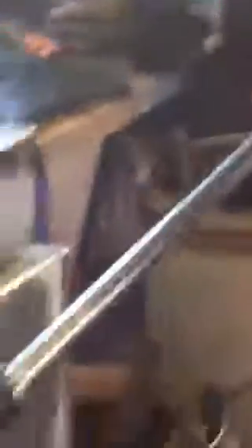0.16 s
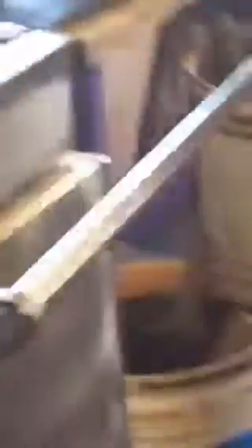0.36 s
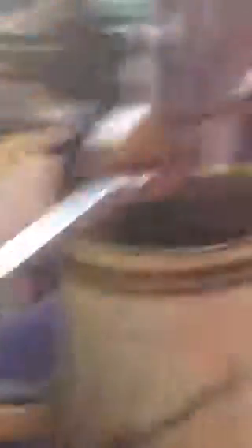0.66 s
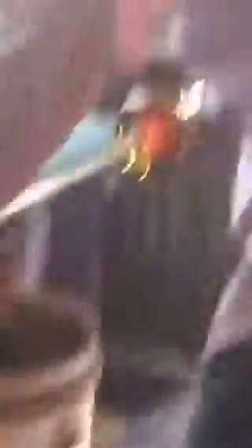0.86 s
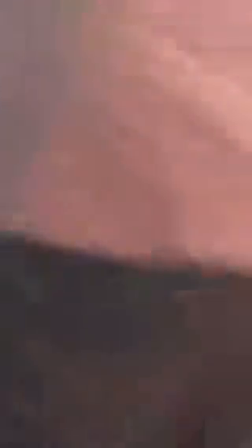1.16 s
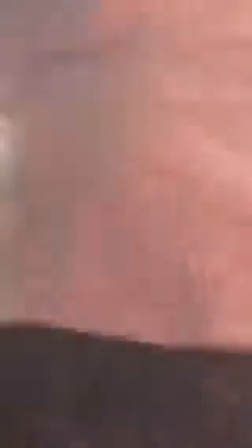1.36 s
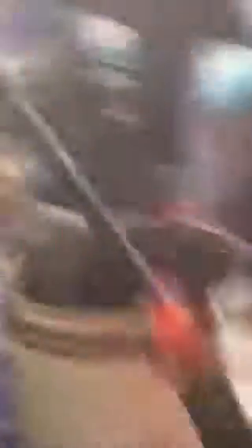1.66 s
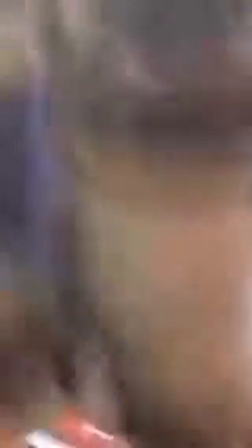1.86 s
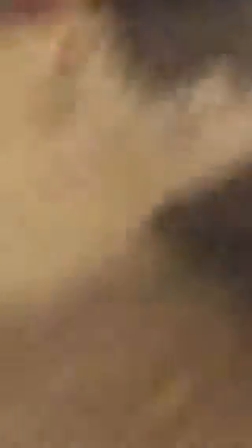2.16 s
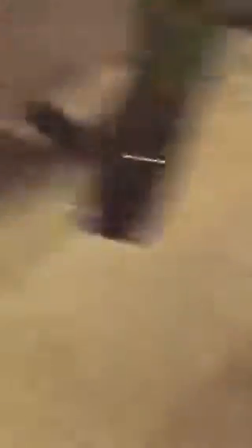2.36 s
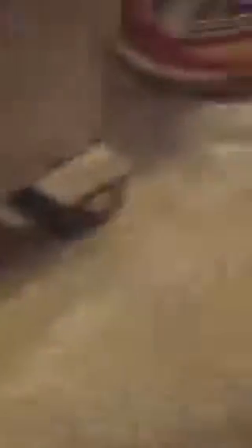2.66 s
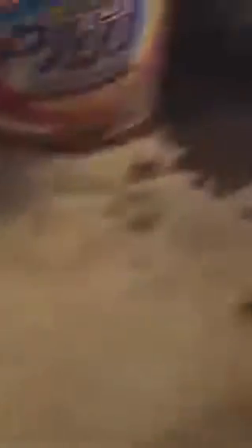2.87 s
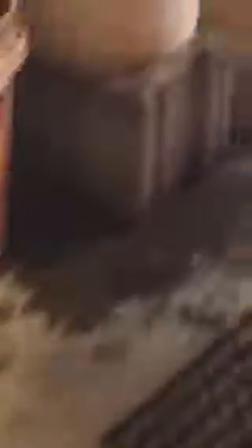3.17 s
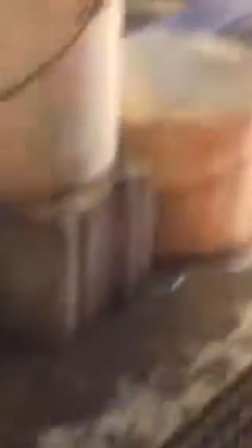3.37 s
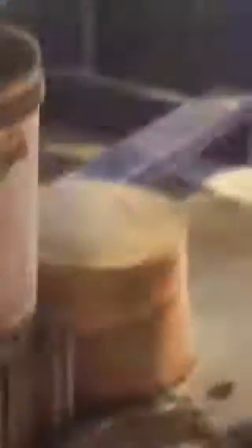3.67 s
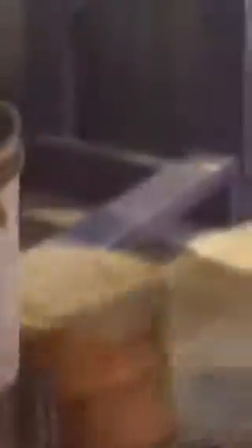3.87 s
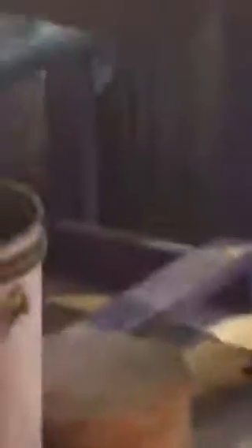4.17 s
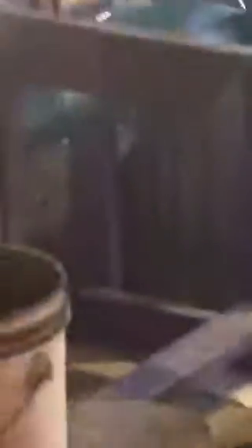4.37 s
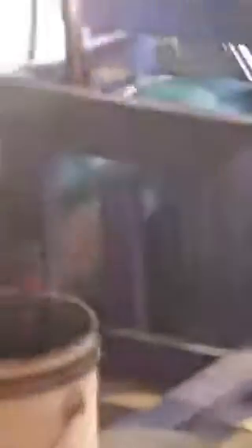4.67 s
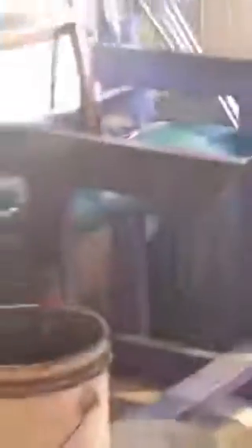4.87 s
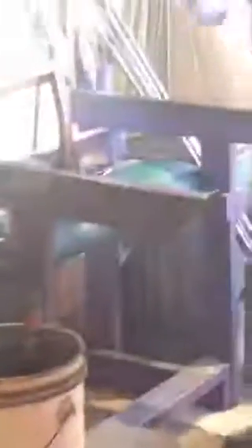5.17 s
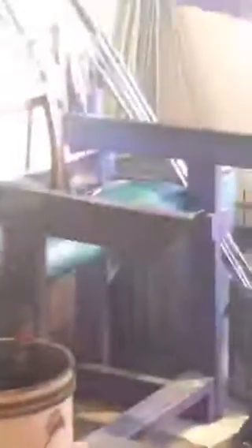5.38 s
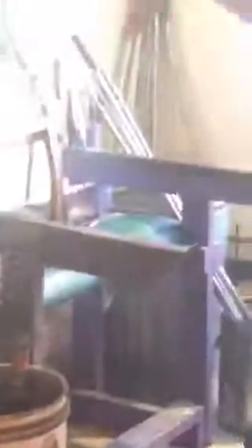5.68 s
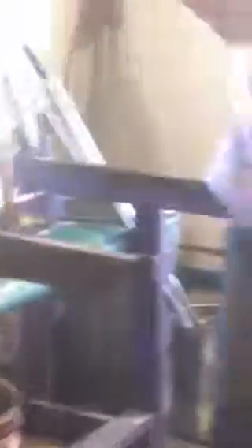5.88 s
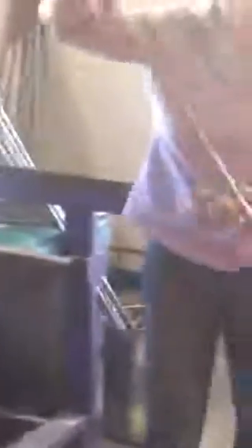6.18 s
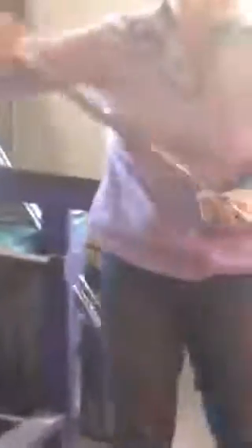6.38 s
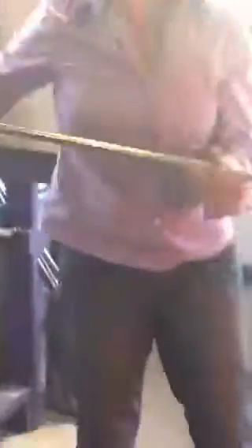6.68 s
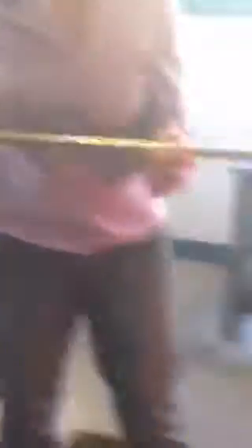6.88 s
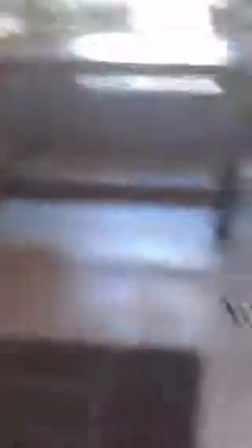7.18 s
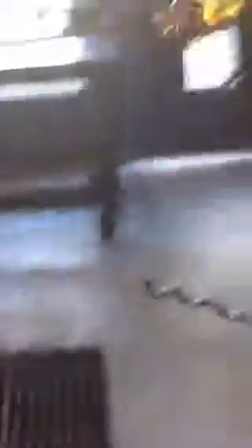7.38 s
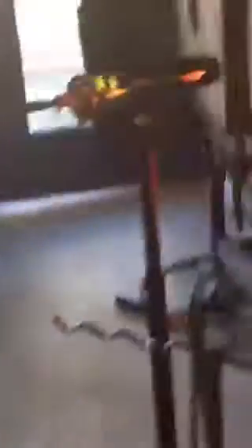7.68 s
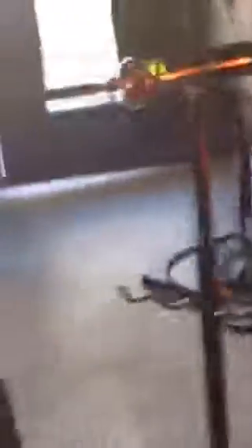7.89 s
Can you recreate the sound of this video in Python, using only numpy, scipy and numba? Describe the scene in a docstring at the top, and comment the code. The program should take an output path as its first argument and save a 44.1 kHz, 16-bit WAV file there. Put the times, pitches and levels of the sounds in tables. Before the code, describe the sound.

A furnace roars without pause, low and broad with a quivering blower hiss. Two softer tool clinks come first, then three hard pipe cracks, a ringing rod, duller bench knocks, a loud clanging rail and a double metal clatter. Then mostly roar, until a tiny tick at the end. Hard, reverberant workshop, hand-held phone, dulled top treble.

```python
"""A furnace roars steadily: broad noise with low resonances for the flame, and a flickering hiss for its blower.
Over it steel pipes, rods and tools are knocked, clinked and set down in a hard-walled workshop; two knocks are
faint and dull. Each blow is a sharp crack plus decaying tones, and the room answers with echoes that die away.
The roar's levels settle as the hand-held phone turns; its gain control and treble limit shape the whole."""
import sys
import numpy as np
from scipy import signal
from scipy.fft import rfft, irfft, next_fast_len
from scipy.io import wavfile
from scipy.ndimage import uniform_filter1d
from numba import njit

SR = 44100
rng = np.random.default_rng(int(sys.argv[2]) if len(sys.argv) > 2 else 0)


def persist_wave(psi):
    """Save psi, clipped to +-1, as 16-bit WAV."""
    counts = np.round(np.clip(psi, -1, 1) * 32767).astype(np.int16)
    wavfile.write(sys.argv[1], SR, np.atleast_2d(counts).T)


def volts_from_db(level):
    """Convert decibel levels to linear amplitude ratios."""
    exponent = np.asarray(level, float) / 20
    return 10 ** exponent


N = 354696  # length of the scene [samples]
TAIL = int(.9 * SR)  # length of one blow with its echoes [samples]


def on_log(points, hz):
    """Reads a table of (frequency [Hz], value) along a logarithmic frequency axis."""
    f, value = np.transpose(points)
    return np.interp(np.log(np.maximum(hz, 1)), np.log(f), value)


def unit(x):
    """Scales a sound to rms 1."""
    return x / np.sqrt(np.mean(x ** 2))


def walk(rate):
    """Slow random wandering of rms 1: levels drawn rate times a second, smoothed twice."""
    hold = int(SR / rate)
    steps = np.repeat(rng.standard_normal(N // hold + 1), hold)
    smooth = uniform_filter1d(uniform_filter1d(steps, hold), hold)
    return unit(smooth[:N])


def bands(gain, centres, n):
    """Fresh noise of the given spectrum, split into overlapping bands that add up to it."""
    log_hz = np.log(np.maximum(np.arange(len(gain)) * SR / n, 1))
    spectrum = gain * rfft(rng.standard_normal(n))
    shares = [np.interp(log_hz, np.log(centres), row) for row in np.eye(len(centres))]
    return [irfft(spectrum * share, n) for share in shares]


def settle(start_db, end_db, time_s):
    """A level that eases exponentially from its first value to its lasting one."""
    fade = np.exp(-np.arange(N) / SR / time_s)
    return volts_from_db(end_db + (start_db - end_db) * fade)


def causal(db):
    """Turns dB levels into a spectrum whose response starts at once, with nothing before it."""
    cepstrum = irfft(db * np.log(10) / 20)
    half = len(cepstrum) // 2
    # folding the second half onto the first gives the minimum-phase response
    fold = np.r_[1, np.full(half - 1, 2), 1, np.zeros(half - 1)]
    return np.exp(rfft(cepstrum * fold))


def furnace():
    """Flame and blower share one surge, so the two swell together."""
    surge = walk(9.2)
    return flame(surge) + blower(surge)


def flame(surge):
    """Turbulent burning makes broad noise and drives the chamber's low resonances."""
    # furnace chamber resonances: (frequency [Hz], width [Hz], relative level [dB])
    resonances = [(58.3, 11, -11), (126, 21, -3), (150.8, 28.5, -4.5), (172, 16, -4), (222.5, 30.5, 1),
                  (276, 44.6, -8), (322, 37, -15)]
    # broad flame noise under them: (frequency [Hz], relative level per Hz [dB])
    flame_noise = [(20, -42.5), (42, -37), (75, -16), (200, -17.5), (330, -25.5), (450, -31.5), (900, -88)]
    n = next_fast_len(N)
    hz = np.arange(n // 2 + 1) * SR / n
    power = volts_from_db(on_log(flame_noise, hz)) ** 2
    for f, width, db in resonances:
        power = power + volts_from_db(db) ** 2 / (1 + ((hz - f) / (width / 2)) ** 2) ** 2
    steady = bands(np.sqrt(power), [62, 89.5, 121, 177, 233, 308], n)
    # each band follows the shared surge and wanders on its own, both in dB
    deep, throb, *rest = [b[:N] * volts_from_db(0.74 * surge + 0.44 * walk(4.8)) for b in steady]
    # the levels settle as the phone turns: start [dB], lasting level [dB], time constant [s]
    rumble = settle(-35.5, -29, 0.69) * unit(sum(rest))
    throb = settle(-30.5, -49, 0.83) * unit(throb)  # near 90 Hz
    deep = volts_from_db(-45.5) * unit(deep)  # steady bottom near 60 Hz
    return rumble + throb + deep


def blower(surge):
    """The blower jet hisses above the flame, flickering band by band; nearby walls comb its spectrum."""
    # hiss of the jet: (frequency [Hz], relative level per Hz [dB])
    jet_noise = [(240, -32), (400, -1), (470, -5.5), (620, 1), (850, -2.5), (1200, -4), (1450, -9.5),
                 (2100, -10), (2600, -15.5), (3300, -18), (4050, -21.5), (4900, -32), (7000, -29),
                 (7800, -34.5), (8300, -59)]
    comb_db, comb_ms = -8, 30  # strength and decay time constant of the wall echoes
    n = next_fast_len(N)
    hz = np.arange(n // 2 + 1) * SR / n
    jet = volts_from_db(on_log(jet_noise, hz)) * np.clip(hz / 400, 0, 1) ** 4
    decay = np.exp(-1000 * np.arange(TAIL) / SR / comb_ms)
    echoes = unit(rng.standard_normal(TAIL) * decay) / np.sqrt(TAIL)
    jet = jet * np.abs(1 + volts_from_db(comb_db) * rfft(echoes, n))
    steady = bands(jet, 500 * 2 ** np.arange(0, 4.1, .5), n)
    hiss = sum(b[:N] * volts_from_db(0.32 * surge + 1.2 * walk(12)) for b in steady)
    # the settling level is that of the hiss between 2.5 and 4 kHz
    upper = signal.butter(4, [2500, 4000], "bandpass", fs=SR, output="sos")
    return settle(-52, -54, 1.1) * hiss / np.std(signal.sosfilt(upper, hiss))


def steel():
    """Every blow sounds at its moment, with the tones and echoes listed for its kind."""
    # the blows: (time [s], level [dB], body setting around 0.5-1.2 kHz [dB], kind of blow)
    hits = [(.116, -36.5, -11, "tongs"), (.308, -35.5, -0.5, "tongs"), (0.645, -19, -12.5, "pipe"),
            (.8645, -19, -18, "pipe"), (1.2199, -16, -12, "pipe"), (2.276, -36, 6, "rod"),
            (2.4136, -24.5, -3.5, "rod"), (2.977, -33.5, 3.5, "bench"), (3.364, -37, -14, "bench"),
            (3.539, -29, -2, "bench"), (4.510, -17.5, -11, "rail"), (4.866, -42.5, -4.5, "bench"),
            (5.011, -20, -16, "bin"), (5.115, -30, -13, "bin"), (5.305, -38, 4.5, "bench"),
            (7.961, -58.5, -13, "tip"), (7.971, -54.5, -16, "tip")]
    # tones of each kind: (frequency [Hz], energy against a flat 0 dB crack [dB], time to fall 60 dB [s])
    tones = { "tongs": [(1964, -9.5, 0.047), (2520, -16, .03), (3970, -20, .04), (5220, -28, .08),
             (7050, -27, .12)], "pipe": [(2240, -21.5, 0.056), (2764, -20, 0.035), (4090, -22.5, 0.018),
             (5260, -28.5, 0.037), (5900, -25, 0.04)], "rod": [(1192, -10.5, 0.2), (1996, -12.5, 0.083),
             (2617, -14, 0.055), (3115, -22.5, 0.027), (3560, -26, .04), (4640, -21.5, 0.34),
             (5855, -20, 0.21), (7160, -26.5, 0.11)], "bench": [(590, -20, .02), (2350, -13, 0.0072)],
             "rail": [(2353, -15, 0.18), (2770, -15.5, 0.13), (3306, -17.5, 0.071), (2560, -25, 0.033),
             (3900, -16.5, 0.012)], "bin": [(808, -18, 0.031), (1468, -19.5, 0.067), (1880, -33.5, 0.06),
             (2306, -24.5, 0.094), (5940, -27, .05)], "tip": [(6990, -1.5, 0.0089)], }
    # crack of each kind: (edge setting around 4.5-8 kHz [dB], thump setting under 450 Hz [dB],
    # build-up time constant of its echoes [ms], direct sound setting [dB])
    cracks = {"tongs": (-14.5, -8, 5.5, 12), "pipe": (-2.9, -17, 3, 21), "rod": (-27, -6, 2.1, 13.5),
              "bench": (-6, -9, 1.8, 19), "rail": (-1.2, 0.2, 15, 11.5), "bin": (-1.5, -4, 22.5, 11),
              "tip": (6, -21, 3, 34)}
    # "faint" is a faint dull knock, thing unknown; it shares the bench's crack and tones
    tones["faint"], cracks["faint"] = tones["bench"], cracks["bench"]
    hits = [(s, db, body_db, "faint" if s in (4.866, 5.305) else kind) for s, db, body_db, kind in hits]
    touch_ms, touch_db = 4.7, -5.5  # a pipe touches lightly just before it lands
    touches = [(s - touch_ms / 1000, db + touch_db, body_db, kind)
               for s, db, body_db, kind in hits if kind == "pipe"]
    out = np.zeros(N + TAIL)
    for s, db, body_db, kind in hits + touches:
        start = int(s * SR)
        out[start:start + TAIL] += volts_from_db(db) * blow(body_db, *cracks[kind], tones[kind])
    return out[:N]


def blow(body_db, edge_db, thump_db, build_ms, direct_db, modes):
    """One sharp crack sets off decaying tones; the room answers."""
    pair_split = .006  # round steel is never quite round: each mode is a beating pair this far apart
    t, n = np.arange(TAIL) / SR, 2 * TAIL
    hz = np.arange(TAIL + 1) * SR / n
    colour = on_log([(60, thump_db - 24), (140, thump_db + 13.0), (420, thump_db + 8.0),
                     (600, body_db + 6.0), (900, body_db + 10.5), (1600, 0.11), (3600, 0.44),
                     (6000, edge_db + 0.5), (8000, edge_db - 7.0)], hz)
    ring = np.zeros(TAIL)
    for f, db, t60 in modes:
        beating = np.sin(2 * np.pi * f * t) * np.cos(np.pi * pair_split * f * t)
        # unit() gives each mode its stated energy, whatever its decay
        ring += volts_from_db(db) * unit(beating * 1000 ** (-t / t60))
    struck = causal(colour) + rfft(ring, n) / np.sqrt(TAIL)
    heard = irfft(struck * rfft(room(build_ms, direct_db), n), n)[:TAIL]
    # rms 1 over the first 40 ms
    return heard / np.sqrt(np.mean(heard[:int(.04 * SR)] ** 2))


def room(build_ms, direct_db):
    """Response from one spot: a direct burst, and echoes that fill in and die at a pace set by pitch."""
    # dying away of the echoes: (frequency [Hz], time to fall 60 dB [s])
    echo_decay = [(150, 0.85), (700, 0.6), (2000, 0.64), (4000, 0.53), (6000, 0.46), (8000, 0.37)]
    early_share = .3  # floor and bench echoes arrive at once, the walls later
    lumpy_db, lump_ms, smooth_ms = 1.5, 3, 120  # early echoes come unevenly, later ones blend
    chatter_ms = 1.4  # steel on steel chatters briefly, so the direct sound is a short burst
    t = np.arange(TAIL) / SR
    centres, t60s = np.transpose(echo_decay)
    noise = bands(np.ones(TAIL // 2 + 1), centres, TAIL)
    dying = sum(b * 1000 ** (-t / t60) for b, t60 in zip(noise, t60s))
    fill = 1 - (1 - early_share) * np.exp(-1000 * t / build_ms)
    lumps = volts_from_db(lumpy_db * np.exp(-1000 * t / smooth_ms) * walk(1000 / lump_ms)[:TAIL])
    echoes = fill * lumps * dying
    burst = unit(rng.standard_normal(TAIL) * np.exp(-1000 * t / chatter_ms)) / np.sqrt(TAIL)
    return echoes + volts_from_db(direct_db) * burst


def scene():
    """Furnace and steel add up at one microphone."""
    return (furnace() + steel())[None]


@njit
def follow(x, attack, release):
    """Tracks loudness with an envelope that rises fast and falls slowly."""
    out, e = np.empty(len(x)), 0.
    for i in range(len(x)):
        e += (abs(x[i]) - e) * (attack if abs(x[i]) > e else release)
        out[i] = e
    return out


def roll_off(x):
    """The treble ends steeply here."""
    return signal.sosfilt(signal.butter(12, 8400, fs=SR, output="sos"), x)


def record(dry):
    """Gain control turns loud blows down and lets the roar creep back; a steep filter cuts the top treble."""
    top_db, ratio = -27.5, 1.09  # envelope level where turning down starts, and how strongly it acts
    attack_s, release_s = 0.036, 0.25
    envelope = follow(dry[0], 1 / (attack_s * SR), 1 / (release_s * SR))
    gain = np.minimum(1, volts_from_db(top_db) / (envelope + 1e-9)) ** (1 - 1 / ratio)
    treble_limit = signal.ellip(10, .3, 90, 8080, fs=SR, output="sos")  # low-pass at 8080 Hz
    return roll_off(signal.sosfilt(treble_limit, dry * gain))


dry = scene()
out = record(dry)
persist_wave(out)
```